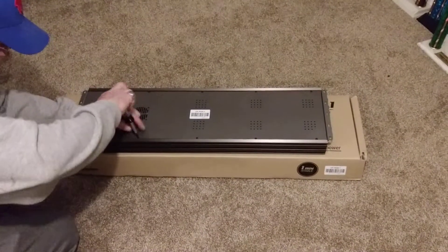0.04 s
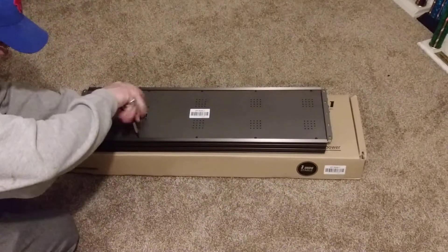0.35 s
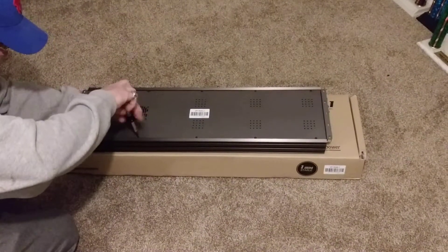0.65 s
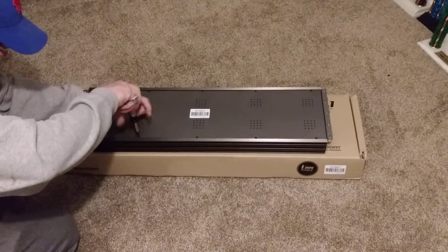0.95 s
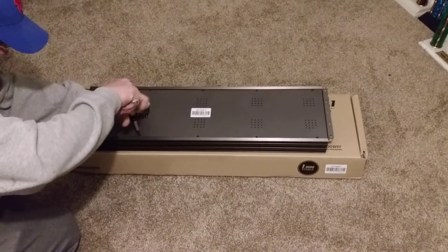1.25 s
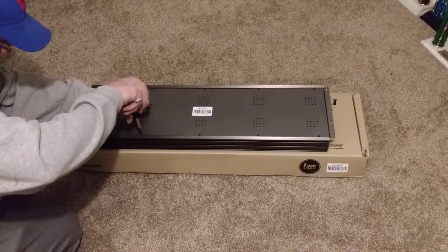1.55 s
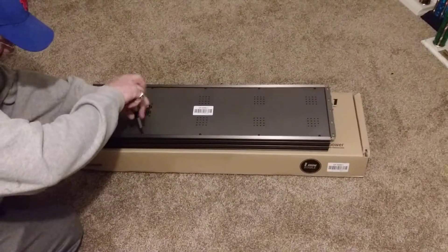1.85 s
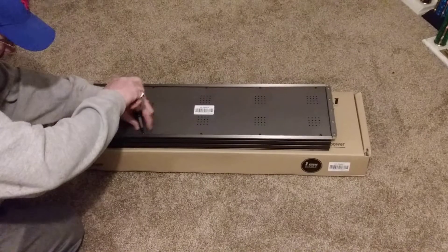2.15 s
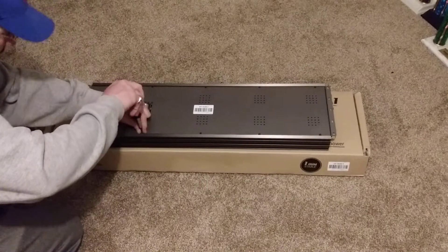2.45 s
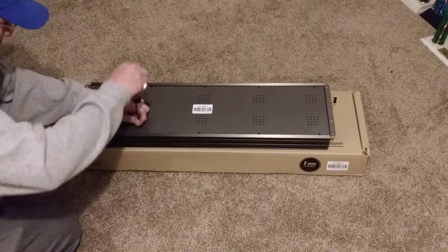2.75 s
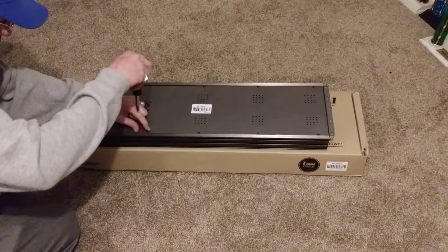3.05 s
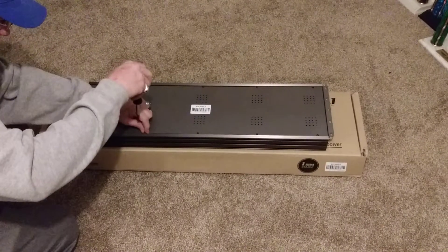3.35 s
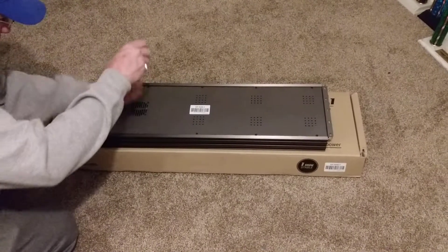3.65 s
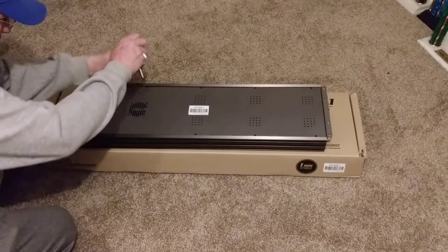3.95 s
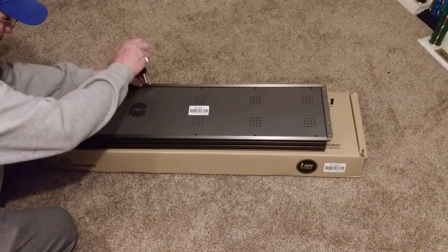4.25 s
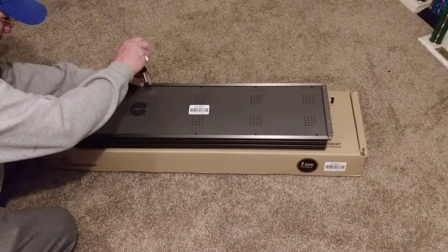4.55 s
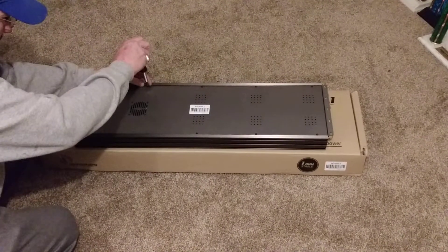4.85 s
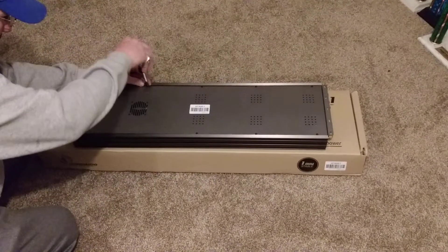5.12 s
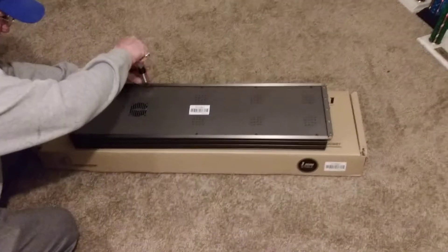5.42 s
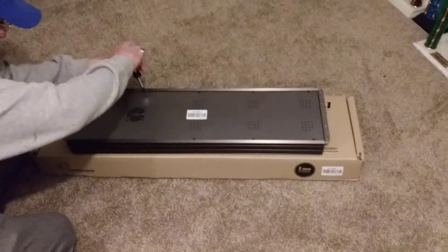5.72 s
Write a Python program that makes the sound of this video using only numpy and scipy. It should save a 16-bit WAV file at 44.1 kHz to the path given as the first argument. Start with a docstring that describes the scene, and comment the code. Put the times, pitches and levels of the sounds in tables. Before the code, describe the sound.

Light, irregular knocks on a metal panel, a brief bright jingle of small steel parts and a screwdriver tip clacking into a screw.

```python
"""A screwdriver works on a sheet-metal case that sits on a cardboard box in a quiet, carpeted room.
Hand and tool knock the panel into a short, hollow ring, and small steel parts clink brightly.
The tip scrapes in tiny slips, tinks against a screw and snaps into a screw head, ringing the shaft.
Underneath lie faint finger touches, a rustling sleeve and a bed of mains hum and soft hiss."""
import sys
import numpy as np
from scipy import signal
from scipy.fft import rfft, irfft, next_fast_len
from scipy.io import wavfile

SR = 44100
rng = np.random.default_rng(int(sys.argv[2]) if len(sys.argv) > 2 else 0)


def int16_out(signal):
    """Quantize to a 16-bit WAV file."""
    q = np.round(np.clip(np.atleast_2d(signal).T, -1, 1) * 32767)
    wavfile.write(sys.argv[1], SR, q.astype(np.int16))


N = 263718

# panel knocks: t/s, panel level/dB, brightness f/Hz, favoured f/Hz, tick level/dB, second contact t/s
# (the last is an offset: negative = a graze before, positive = a settling after, 0 = none)
KNOCK_CUES = [(0.3114, -47, 1650, 947, -66, 0), (.553, -52.5, 618, 280, -69, 0.047),
              (.766, -41, 513, 380, -57, 0), (.796, -46.5, 433, 390, -64.5, -0.0013),
              (.91, -54.5, 850, 740, -71, -0.025), (1.017, -52, 1090, 477, -66.5, -0.018),
              (1.294, -59.5, 950, 730, -78, 0.005), (1.7975, -42.5, 2450, 880, -45.5, -.0045),
              (1.819, -47.5, 800, 470, -55.5, 0), (2.182, -47.5, 556, 277, -60.5, -.012),
              (2.538, -51, 850, 496, -58, -0.01), (2.573, -55.5, 650, 635, -75, -0.012),
              (4.2754, -39, 2800, 1002, -53.5, -0.00031), (4.634, -47.5, 1700, 340, -68, -0.027),
              (4.8453, -35, 2400, 338, -42, -.0065), (5.078, -43.5, 1450, 345, -67.5, -0.013),
              (5.348, -62.5, 3470, 1530, -67, 0.041), (5.696, -59.5, 820, 526, -75, -0.011),
              (5.972, -58, 800, 499, -70, -0.021)]
# small steel parts colliding: t/s, steel level/dB, panel level/dB, favoured panel f/Hz
CLINK_CUES = [(2.644, -34.5, -56, 495), (2.65, -36, -57, 495), (2.6596, -34.5, -55.5, 332),
              (2.6637, -15.5, -44.5, 1160), (2.669, -19, -46.5, 1740), (2.673, -23.5, -41, 340),
              (2.6992, -26.5, -48, 495), (2.7548, -23.5, -55, 645), (2.761, -29.5, -47.5, 1264),
              (3.831, -66, -85, 640)]
# the tip snapping home and rebounding: t/s, tool level/dB, panel level/dB
SNAP_CUES = [(5.531, -25, -41), (5.536, -31.5, -57), (5.5382, -33.5, -58), (5.562, -51, -72)]
# the tip sliding on steel: peak t/s, level/dB, swell/s, fade/s, top treble gain/dB
SCRAPE_CUES = [(.946, -66.5, .008, .008, 9), (2.06, -70, .03, .02, 6), (2.301, -54, 0.016, .006, 5),
               (3.24, -59.5, .005, .013, -10), (3.269, -41.5, 0.0091, 0.0057, 0),
               (5.692, -58.5, .034, .017, 3)]
# the bit glancing off a screw: t/s, level/dB
TINK_CUES = [(2.5385, -51.5)]
# stretch in which fingers shift on the panel: start t/s, end t/s
TOUCH_SPAN = (0, 2.6)
# sleeve swells as the arm shifts: peak t/s, level/dB, half length/s
SLEEVE_CUES = [(0.027, -66.5, 0.047), (0.846, -72.5, 0.079), (3.174, -74.5, 0.18), (3.92, -78, 0.189),
               (5.65, -74, 0.15)]

# ringing modes of panel, small parts, shaft and bit: f/Hz, relative level/dB, t60/s
PANEL_RING = [(238.9, -21.5, .2), (270, -16, 0.12), (329.6, 2, .16), (383.5, -9, .13), (405.7, -2, 0.16),
              (468, -12.5, 0.3), (500.2, -12, 0.28), (542, -12.5, 0.25), (645.6, -7, 0.17),
              (713, -10.5, 0.24), (755, -3, .13), (933.5, -6, 0.1193), (1007, -2.5, 0.086), (1160, -6, .13),
              (1297, -8.5, .11), (1413, 0.5, 0.063), (1617, -9, .11), (1715, -11.5, .13), (1890, -8, 0.12),
              (2640, -6.5, .08)]
STEEL_RING = [(7224, -11, .2), (7620, -7, .14), (7950, -6, .15), (8195, -4, .14), (8255, -2, .13),
              (8554, -8, .14), (8776, -4, .15), (9005, -4, .16), (9523, -9, .18), (10201, -11, .14),
              (10541, -6, .14), (10661, -11, .15), (11604, -5, .15), (11891, -6, .14), (12700, -6, .13),
              (13683, -7, .13), (13999, -9, .13), (15191, -14, .13)]
SHAFT_RING = [(2185, -2, 0.028), (2280, -1, .03), (2476, 10.5, 0.026), (2680, 0.5, 0.046),
              (7800, -14, 0.092), (7920, -7, 0.091), (8020, -5, 0.1), (8320, -6, .09), (8900, -14, 0.085),
              (9130, -13, 0.14)]
BIT_RING = [(5480, -5.5, .1), (5750, -9, 0.061), (7516, -4, .08), (8720, -1.5, .08), (9100, 3, 0.079),
            (9520, 1.5, .08), (9900, -16, .12), (11900, -4, .1)]
# tone curves of the dense overtones and noise layers: f/Hz, relative level/dB
PANEL_EQ = [(30, -41.5), (100, -18.5), (160, -10.5), (230, -11), (320, 0), (600, -2), (1000, -3),
            (1500, -6), (2700, -8), (4300, -13), (16000, -32)]
TICK_EQ = [(40, -61), (300, -25), (2600, -3.5), (4300, -16), (5400, -14), (8200, -0.5), (10500, -12.5),
           (12500, -12), (15700, -21.5)]
STEEL_EQ = [(40, -75), (250, -47), (600, -32.5), (1800, -21), (2600, -17.5), (3200, -23.5), (4500, -23.5),
            (6000, -17), (7000, -9), (8200, 0.5), (9800, -10), (12500, -2), (14000, -8.5), (15700, -11.5)]
SHAFT_EQ = [(40, -59), (250, -22), (900, -34), (1500, -10), (2100, -7), (2480, -2.5), (3000, -10.5),
            (4000, -15.5), (5000, -11), (7200, -7.5), (8400, 4), (10000, -7), (12500, -16.5), (15700, -24)]
SCRAPE_EQ = [(40, -62), (400, -8), (2600, -8.5), (4500, -13.5), (7200, -5), (8400, 9), (9400, -3.5),
             (13000, -7), (15700, -23)]
BIT_EQ = [(300, -49.5), (4800, -29.5), (5500, -6), (7000, -8), (9200, 2.5), (11900, -5), (13000, -20),
          (15700, -24.5)]
SLEEVE_EQ = [(200, -16), (600, -8), (3000, -32), (6800, -16.5), (8300, -2), (10000, -14), (15700, -20.5)]
HISS_EQ = [(15, -88), (25, -37.5), (91, -12.5), (110, -12.5), (205, -13.5), (234, -5.5), (268, -12.5),
           (447, -12), (485, -12.5), (767, -16.5), (1210, -19.5), (1630, -19.5), (6450, -27), (8450, -25),
           (15700, -22)]
# mains harmonics: f/Hz, level/dB
HUM_PARTIALS = [(120, -76), (240, -77.5), (360, -83)]
# decay of reflections in case and room: f/Hz, t60/s
ROOM_DECAY = [(200, 0.64), (600, 0.27), (2000, 0.24), (8000, 0.17), (15000, 0.23)]

AGE = np.arange(SR // 3) / SR  # time since a hit, in s


def knocks(second_db=-8, second_dulling=.55):
    """Hand and tool bump the panel, often twice; steel meeting steel puts a tick on top."""
    out = np.zeros(N)
    for s, panel_db, bright_hz, focus_hz, tick_db, second_s in KNOCK_CUES:
        thud, rise = bump(bright_hz, focus_hz)
        tick = unit_hit(shaped(eased(echoes(direct_db=3, life=.43), rise), TICK_EQ))
        add(out, s - rise / 2, amp(panel_db) * thud + amp(tick_db) * tick)
        if second_s:
            thud, rise = bump(second_dulling * bright_hz, focus_hz)
            add(out, s + second_s - rise / 2, amp(panel_db + second_db) * thud)
    return out


def bump(bright_hz, focus_hz):
    """One thud and its attack time: a softer contact is slower and favours its own spot more."""
    softness = 1000 / bright_hz
    rise = .0033 * softness ** 1.05
    return panel(bright_hz, focus_hz, focus_db=7.5 * np.sqrt(softness), rise=rise), rise


def panel(bright_hz, focus_hz, focus_db, rise, ring_db=2.5, bass_limit_hz=250):
    """The sheet rings, most of all in the modes that the struck spot favours."""
    favour = lambda hz: amp(focus_db * np.exp(-(np.log((hz + 1) / focus_hz) / .07) ** 2))
    # a soft, long contact loses the highs; a hard, short one carries little bass
    bass_hz = min(.14 * bright_hz, bass_limit_hz)
    contact = lambda hz: 1 / np.sqrt((1 + (hz / bright_hz) ** 5) * (1 + (bass_hz / (hz + 1)) ** 4))
    wash = unit_hit(shaped(eased(echoes(direct_db=-2, life=.56), rise), PANEL_EQ))
    ring = eased(ringing(PANEL_RING, scatter_db=3), rise + .00064)
    return unit_hit(coloured(wash + amp(ring_db) * ring, lambda hz: favour(hz) * contact(hz)))


def clinks(rise=.0006):
    """Small steel parts strike and bounce, ringing high; being light, they give the panel little bass."""
    out = np.zeros(N)
    for s, steel_db, panel_db, focus_hz in CLINK_CUES:
        ring = eased(ringing(STEEL_RING, scatter_db=3), rise)
        clash = unit_hit(shaped(eased(echoes(direct_db=-6, life=.7), rise), STEEL_EQ))
        jolt = panel(5000, focus_hz, focus_db=13, rise=rise, ring_db=12, bass_limit_hz=450)
        add(out, s - rise / 2, amp(steel_db) * (clash + amp(-6.5) * ring) + amp(panel_db) * jolt)
    return out


def snaps():
    """The tip drops into the screw head with a clack, ringing the shaft and jolting the panel."""
    out = np.zeros(N)
    for s, tool_db, panel_db in SNAP_CUES:
        clack = unit_hit(shaped(echoes(direct_db=.5, life=.76), SHAFT_EQ))
        ring = eased(ringing(SHAFT_RING, scatter_db=5), rise=.00017)
        tool = unit_hit(clack + amp(-3.5) * ring)
        jolt = panel(bright_hz=2200, focus_hz=340, focus_db=3, rise=.00124)
        add(out, s, amp(tool_db) * tool + amp(panel_db) * jolt)
    return out


def scrapes(slips_per_s=4500):
    """The sliding tip catches in a grain of tiny slips, loudest at the peak of the stroke."""
    out = np.zeros(N)
    lead = AGE[-1] / 2
    for s, db, swell, fade, treble_db in SCRAPE_CUES:
        stroke = np.exp(np.minimum((AGE - lead) / swell, (lead - AGE) / fade))
        slips = (rng.random(len(AGE)) < slips_per_s / SR) * rng.standard_normal(len(AGE)) * stroke
        rasp = signal.fftconvolve(slips, echoes(direct_db=-6.5, life=.54))[:len(AGE)]
        colour = lambda hz: amp(along(SCRAPE_EQ, hz) + treble_db * along([(8500, 0), (12500, 1)], hz))
        add(out, s - lead, amp(db) * unit_hit(coloured(rasp, colour)))
    return out


def tinks():
    """A glancing touch on a screw rings the bit alone."""
    out = np.zeros(N)
    for s, db in TINK_CUES:
        ring = eased(ringing(BIT_RING, scatter_db=.5), rise=.00032)
        click = unit_hit(shaped(echoes(direct_db=-3, life=.75), BIT_EQ))
        add(out, s, amp(db) * (click + amp(-5.5) * ring))
    return out


def touches(per_s=7, level_db=-67.5, scatter_db=2, bright_hz=647):
    """Fingertips brush the panel faintly, at random moments and spots."""
    out = np.zeros(N)
    for slot in np.arange(*TOUCH_SPAN, 1 / per_s):
        force, spot = rng.standard_normal(2)
        thud, _ = bump(bright_hz, focus_hz=bright_hz * np.exp(.3 * spot))
        add(out, slot + rng.random() / per_s, amp(level_db + scatter_db * force) * thud)
    return out


def sleeve(steady_db=-77):
    """Cloth rustles steadily with the turning wrist and swells when the arm shifts."""
    t = np.arange(N) / SR
    swell_power = sum((amp(db) * np.exp(-((t - s) / half) ** 2 / 2)) ** 2 for s, db, half in SLEEVE_CUES)
    rustle = unit(shaped(rng.standard_normal(N), SLEEVE_EQ))
    return np.sqrt(amp(steady_db) ** 2 + swell_power) * rustle


def hum():
    """The mains lay a low, steady drone under the action."""
    t = np.arange(N) / SR
    return sum(amp(db) * np.sqrt(2) * np.sin(2 * np.pi * (hz * t + rng.random()))
               for hz, db in HUM_PARTIALS)


def hiss(level_db=-67.5):
    """A soft, even bed of noise."""
    return amp(level_db) * unit(shaped(rng.standard_normal(N), HISS_EQ))


def ringing(modes, scatter_db):
    """Damped modes start from rest, at new strengths each hit; neighbours swing in opposite polarity."""
    hz, db, t60 = np.transpose(modes)[:, :, None]
    envelope = amp(db + scatter_db * rng.standard_normal(hz.shape) - 60 * AGE / t60)
    polarity = (-1) ** np.arange(len(hz))[:, None]
    return unit_hit(np.sum(polarity * envelope * np.sin(2 * np.pi * hz * AGE), axis=0))


def echoes(direct_db, life):
    """A sharp crack, then case and room reflections, longest in the bass; life scales their decay time."""
    hz, t, noise = signal.stft(rng.standard_normal(len(AGE)), SR, nperseg=256)
    t60 = life * along(ROOM_DECAY, hz)[:, None]
    tail = signal.istft(noise * amp(-60 * t / t60), SR, nperseg=256)[1][:len(AGE)]
    crack = rng.standard_normal(len(AGE)) * amp(-60 * AGE / .0034)
    return unit_hit(tail) + amp(direct_db) * unit_hit(crack)


def eased(x, rise):
    """Round off a hit's attack over rise seconds and normalise it."""
    return unit_hit(x * (1 - np.exp(-AGE / max(rise, 1e-4))))


def shaped(x, curve):
    """EQ with a curve of (f/Hz, level/dB) points."""
    return coloured(x, lambda hz: amp(along(curve, hz)))


def coloured(x, gain):
    """Minimum-phase EQ following gain(hz), so nothing rings ahead of an attack."""
    size = 2 * next_fast_len(len(x) // 2 + 4096)
    hz = np.fft.rfftfreq(size, 1 / SR)
    cepstrum = irfft(np.log(np.maximum(gain(hz), 1e-6)))
    cepstrum[1:size // 2] *= 2
    cepstrum[size // 2 + 1:] = 0
    return irfft(rfft(x, size) * np.exp(rfft(cepstrum)))[:len(x)]


def along(points, hz):
    """Read (f/Hz, value) points on a log frequency axis."""
    freqs, values = np.transpose(points)
    return np.interp(np.log(hz + 1), np.log(freqs), values)


def amp(db):
    """Decibels to gain."""
    return 10 ** (np.asarray(db) / 20)


def unit(x):
    """Scale to rms 1."""
    return x / np.sqrt(np.mean(x ** 2) + 1e-20)


def unit_hit(x):
    """Scale a hit to the energy of rms 1 held for 20 ms."""
    return x / np.sqrt(np.sum(x ** 2) / (SR / 50) + 1e-20)


def add(track, s, sound):
    """Mix a sound into the track from time s on."""
    part = track[max(round(s * SR), 0):][:len(sound)]
    part += sound[:len(part)]


def scene():
    """Mono mix of the handwork over its quiet bed."""
    handwork = knocks() + touches() + tinks() + clinks() + snaps() + scrapes()
    return (handwork + hiss() + hum() + sleeve())[None]


def record(dry):
    """A steep low-pass trims the very top."""
    top_hz = 15800
    size = next_fast_len(N + SR // 2)
    lowpass = 1 / np.sqrt(1 + (np.fft.rfftfreq(size, 1 / SR) / top_hz) ** 400)
    return irfft(rfft(dry, size) * lowpass, size)[:, :N]


dry = scene()
out = record(dry)
int16_out(out)
```